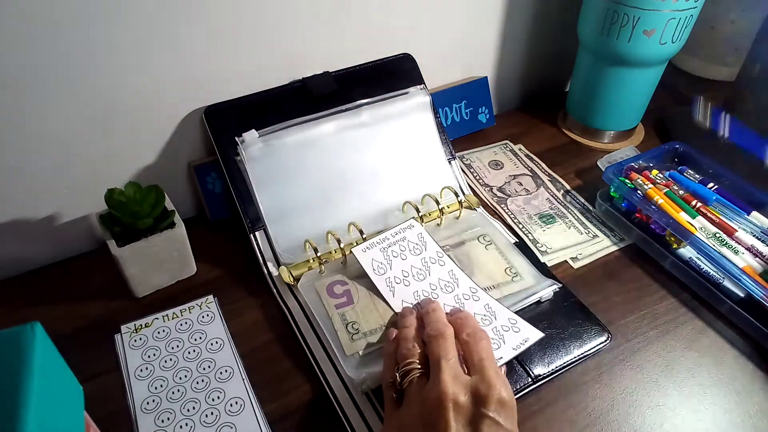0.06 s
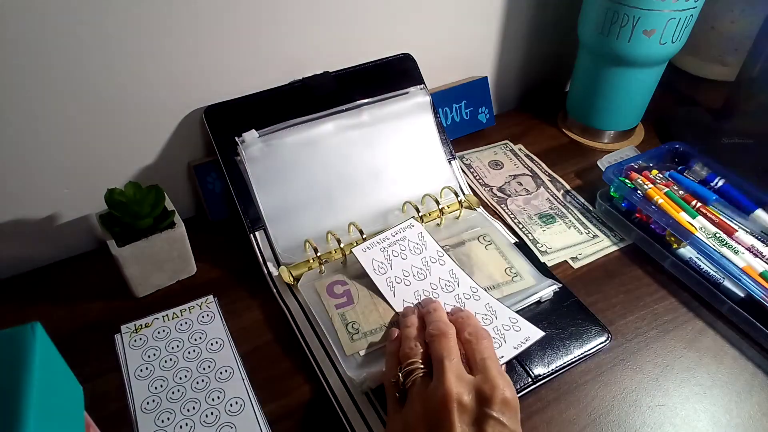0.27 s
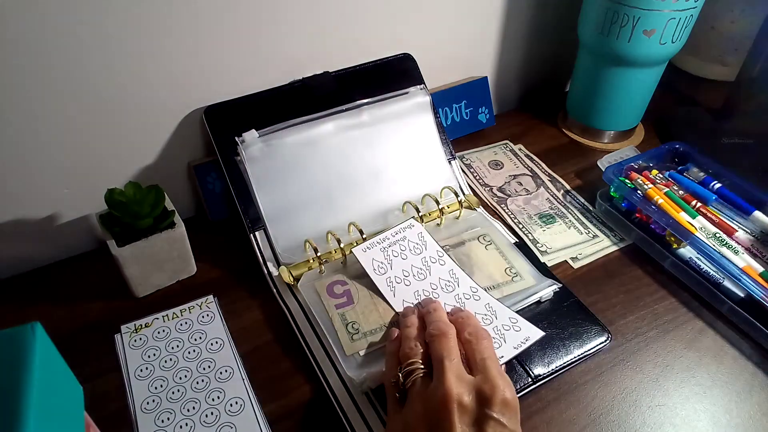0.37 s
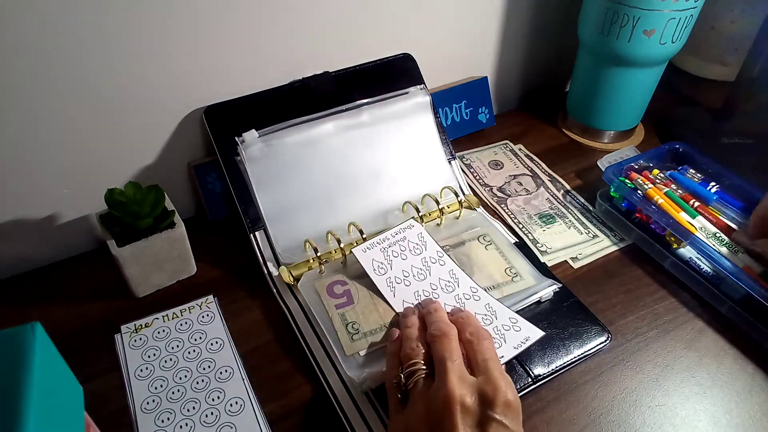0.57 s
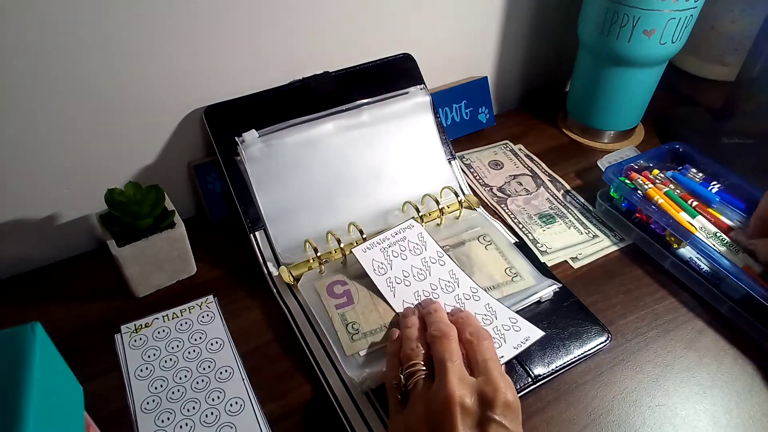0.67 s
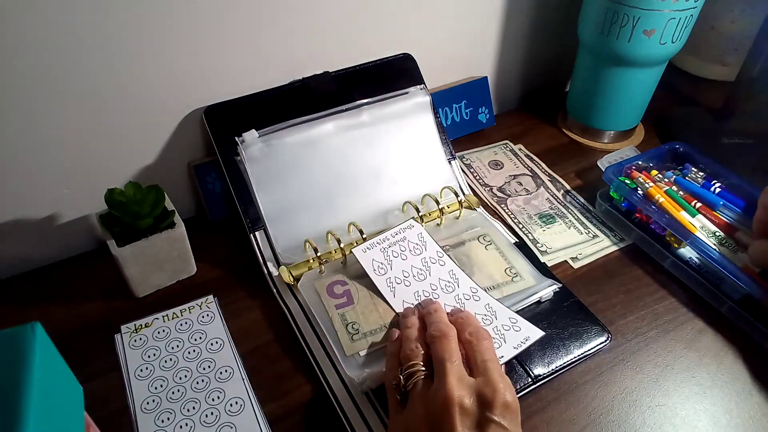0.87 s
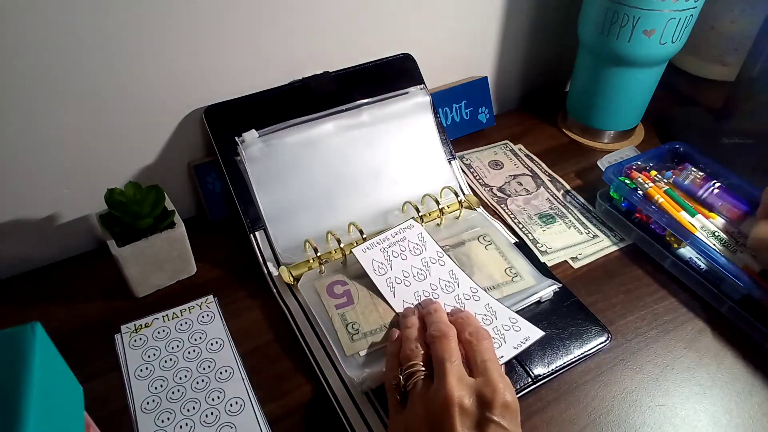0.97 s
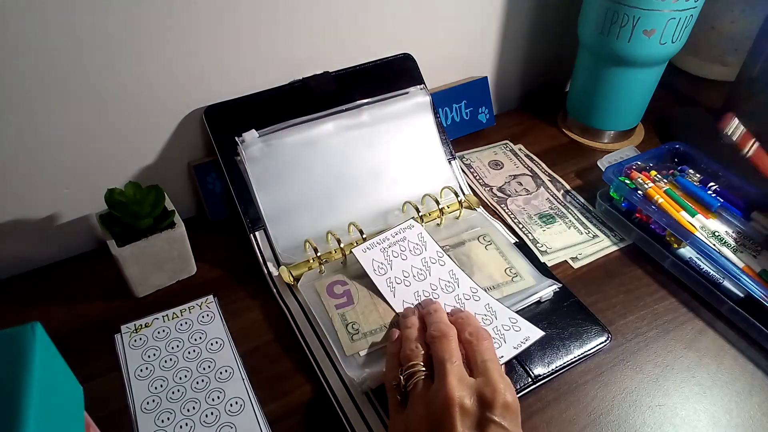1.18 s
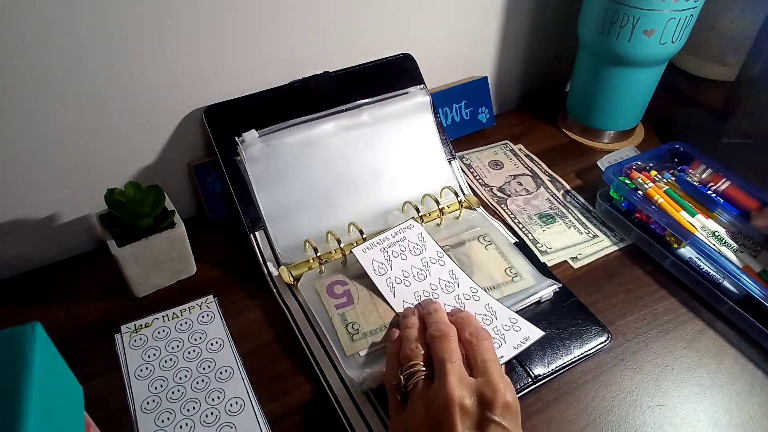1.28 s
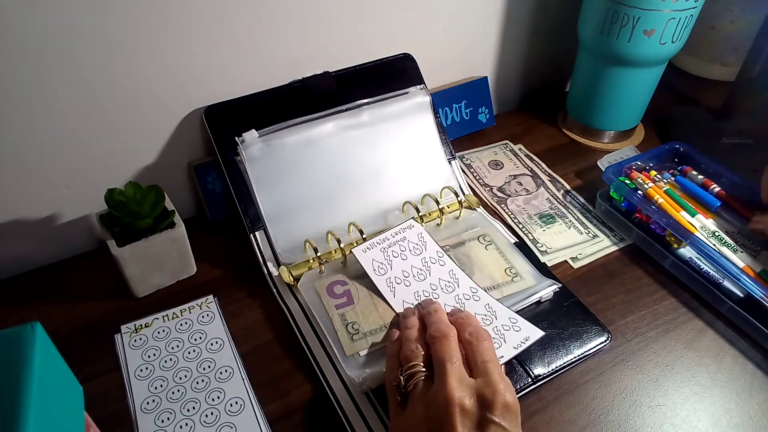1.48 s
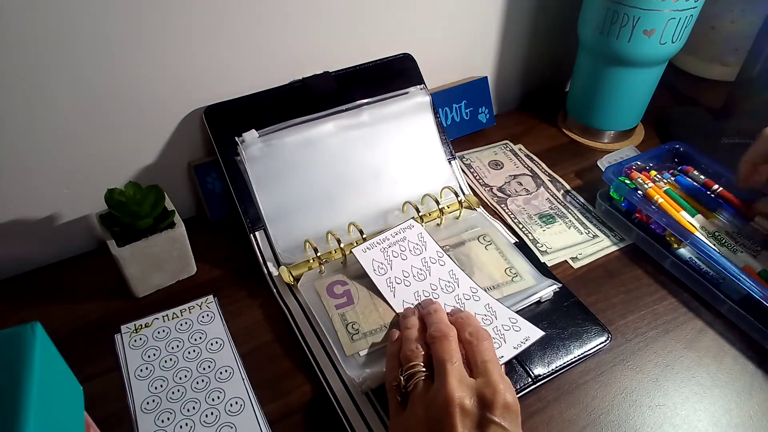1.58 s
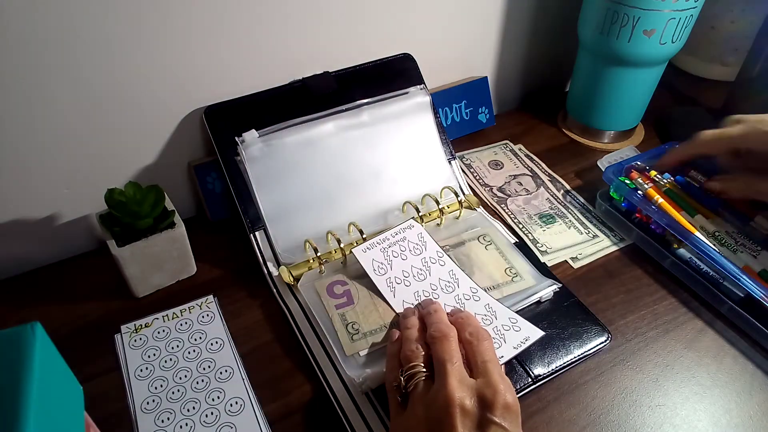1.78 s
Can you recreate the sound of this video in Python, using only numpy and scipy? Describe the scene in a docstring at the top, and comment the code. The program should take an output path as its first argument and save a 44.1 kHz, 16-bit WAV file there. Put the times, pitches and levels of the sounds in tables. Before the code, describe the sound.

Markers clack and rattle in a plastic box as a hand rummages through them indoors

```python
"""A hand rummages through markers in a plastic box on a desk, in a small quiet room.
Over a steady room tone, a faint touch and a hollow bump come first, then a stronger bump at 0.2 s.
Contacts crowd until 0.8 s, again from 0.9 to 1.2 s, and in a last short run from 1.4 to 1.6 s.
Each is a clack of ringing barrels with a thin tick; box walls knock, the bottom thumps, small jostles follow.
Clacks, knocks and thumps are shaped dense rings, box and desk are decaying sines; a noise tail is the room."""
import sys
import numpy as np
from scipy import signal
from scipy.fft import rfft, irfft
from scipy.io import wavfile
from scipy.ndimage import uniform_filter1d

SR = 44100
rng = np.random.default_rng(int(sys.argv[2]) if len(sys.argv) > 2 else 0)


def dump(signal):
    """Clip the signal to [-1, 1] and save it as 16-bit WAV at the path in sys.argv[1]."""
    limited = np.clip(np.atleast_2d(signal).T, -1, 1)
    pcm = np.round(limited * 32767).astype(np.int16)
    wavfile.write(sys.argv[1], SR, pcm)


N = 81585
STRIKE_RISE_S = 0.0009


def from_db(db):
    """Decibels to gain."""
    return 10 ** (np.asarray(db) / 20)


def at_hz(points, hz):
    """Read a table on a log-frequency axis."""
    p = np.array(points)
    return np.interp(np.log(np.maximum(hz, 1)), np.log(p[:, 0]), p[:, 1])


def unit(x):
    """Scale to energy one."""
    return x / np.sqrt(np.sum(x ** 2) + 1e-20)


def coloured(x, spectrum, size=8192):
    """Causal (minimum-phase) filter of unit energy with the given spectrum."""
    grid_hz = np.arange(size // 2 + 1) * SR / size
    cepstrum = irfft(np.log(from_db(at_hz(spectrum, grid_hz))))
    # fold onto positive time: minimum phase
    cepstrum[1:size // 2] *= 2
    cepstrum[size // 2 + 1:] = 0
    response = unit(irfft(np.exp(rfft(cepstrum))))
    return signal.fftconvolve(x, response)[:N]


def high_pass(x, hz):
    """Take away what lies below hz."""
    return signal.sosfilt(signal.butter(3, hz, "high", fs=SR, output="sos"), x)


def add(out, s, x):
    """Mix x into out at time s."""
    i = max(int(s * SR), 0)
    out[i:i + len(x)] += x[:len(out) - i]


def dense_ring(t60_s, size=4096, count=3):
    """Many close, equally strong modes dying together; energy one."""
    t = np.arange(size) / SR
    fade = (1 - np.exp(-t / STRIKE_RISE_S)) * from_db(-60 * t / t60_s)
    x = rng.standard_normal(size) * fade
    # alternately flatten the spectrum and restore the smooth fade
    for _ in range(count):
        spectrum = rfft(x)
        x = irfft(spectrum / (np.abs(spectrum) + 1e-12))
        x = x * fade / np.sqrt(np.abs(uniform_filter1d(x * x, size=96)) + 1e-14)
    return unit(x)


def struck(times_s, levels_db, t60_s, spectrum):
    """A dense plastic ring of one colour at each contact."""
    out = np.zeros(N)
    for s, db in zip(times_s, levels_db):
        add(out, s, from_db(db) * dense_ring(t60_s))
    return coloured(out, spectrum)


# room tone colour: (frequency [Hz], relative level [dB])
ROOM_TONE_COLOUR = [(30, -6), (65, 0), (130, -4), (300, -10), (700, -16), (2000, -21), (6000, -26),
                    (9000, -35), (14000, -34), (15500, -26)]
ROOM_TONE_DB = -76


def room_tone():
    """Steady noise, strongest in the bass."""
    return from_db(ROOM_TONE_DB) * coloured(rng.standard_normal(N), ROOM_TONE_COLOUR)


# room decay: (frequency [Hz], T60 [s])
ROOM_T60 = [(100, .45), (300, .3), (800, .22), (2000, .22), (5000, .2), (15000, .17)]
# room tail: (frequency [Hz], level re direct sound [dB])
ROOM_LEVEL = [(100, 7), (300, -2.5), (800, -1), (2000, -1), (5000, -11.5), (10000, -6.5), (15000, -6)]
ROOM_RISE_S = 0.0014


def room(x, count=12):
    """A diffuse tail of noise bands that dies faster in the treble."""
    t, tail = np.arange(SR // 2) / SR, 0
    edges_hz = np.geomspace(45, 18000, count + 1)
    for low, high in zip(edges_hz, edges_hz[1:]):
        hz = np.sqrt(low * high)
        band = signal.butter(2, [low, high], "band", fs=SR, output="sos")
        noise = signal.sosfilt(band, rng.standard_normal(len(t)))
        rise = 1 - np.exp(-(t / ROOM_RISE_S) ** 2)
        fade = from_db(-60 * t / at_hz(ROOM_T60, hz)) * rise
        bandwidth_gain = np.sqrt(2 * (high - low) / SR)
        tail = tail + unit(noise * fade) * bandwidth_gain * from_db(at_hz(ROOM_LEVEL, hz))
    return signal.fftconvolve(x, tail)[:N]


# heavier shoves, through the box into the desk: (time [s], level [dB])
SHOVES = [(0.221, -49), (0.299, -55), (0.388, -56.5), (0.496, -50.5), (0.557, -42.5), (0.59, -55),
          (0.728, -47.5), (0.935, -58), (1.058, -45.5), (1.134, -56.5), (1.21, -60), (1.445, -50),
          (1.513, -53.5), (1.57, -51.5)]
# desk top modes: (frequency [Hz], relative level [dB], T60 [s])
DESK_MODES = [(68.6, 2, 0.15), (90.5, -4, 0.24), (120, 4, 0.072), (181, -0.5, .14)]
DESK_RISE_S = 0.013


def desk():
    """The desk top swells and dies in a few low modes after each shove."""
    out, t = np.zeros(N), np.arange(SR // 2) / SR
    rise = 1 - np.exp(-t / DESK_RISE_S)
    for s, level_db in SHOVES:
        for hz, db, t60_s in DESK_MODES:
            swing = np.sin(2 * np.pi * (hz * t + rng.random()))
            add(out, s, from_db(level_db + db - 60 * t / t60_s) * rise * swing)
    return out


MODE_SPREAD_DB, LOAD_SHIFT = 2.5, 0.035   # scatter per hit: strength; detuning by the pile, share of pitch


def box(times_s, levels_db, modes):
    """Every contact drives each mode of the box with a strength and a slight detuning of its own."""
    out, t = np.zeros(N), np.arange(SR // 3) / SR
    for hz, db, t60_s in modes:
        fade = rng.choice([-1, 1]) * from_db(-60 * t / t60_s)
        scatter = rng.standard_normal((len(times_s), 2))
        for s, level_db, (strength, detune) in zip(times_s, levels_db, scatter):
            swing = np.sin(2 * np.pi * hz * (1 + LOAD_SHIFT * detune) * t)
            add(out, s, from_db(level_db + db + MODE_SPREAD_DB * strength) * fade * swing)
    return out


# nudges of the box: (time [s], level [dB])
BUMPS = [(0.0902, -74.5), (0.2019, -40)]
# box modes in a bump: (frequency [Hz], relative level [dB], T60 [s])
BUMP_MODES = [(198, -6, 0.098), (307, 0.5, 0.028), (400, -1, 0.12), (492.5, 1, 0.18), (1780, 3.5, 0.0255),
              (2025, 4.5, .03)]
BUMP_LOW_HZ = 170


def bumps():
    """The nudged box rings hollow in its modes, without deep bass."""
    times_s, levels_db = np.transpose(BUMPS)
    return high_pass(box(times_s, levels_db, BUMP_MODES), BUMP_LOW_HZ)


# box bottom on the desk: (frequency [Hz], relative level [dB], T60 [s])
BOTTOM_MODES = [(170.6, -1.5, 0.27), (351, 0.5, 0.42), (497.3, 3.5, 0.26)]
# box walls: (frequency [Hz], relative level [dB], T60 [s])
WALL_MODES = [(952, -5.5, .08), (1285, -10, .12), (1430, -12, .1), (1830, -2, .08), (1985, -3, .11),
              (2250, 1, .04), (3030, -5, .14), (3490, -9, .15), (4000, -9, .1)]
BOX_DB = -9


def box_ringing(times_s, knock_db, thump_db):
    """Knocks ring the wall modes, thumps the bottom modes."""
    walls = box(times_s, knock_db + BOX_DB, WALL_MODES)
    return walls + box(times_s, thump_db + BOX_DB, BOTTOM_MODES)


# thump colour: (frequency [Hz], relative level [dB])
THUMP_COLOUR = [(60, -44.5), (150, 1.5), (260, -5), (380, 3), (500, 4), (750, -13), (2000, -27)]
THUMP_DB, THUMP_T60_S, THUMP_SPREAD_OCTAVES = 21, 0.055, 0.22


def thumps(times_s, levels_db):
    """The bottom of the box thumps higher or lower with the spot that is hit."""
    out = np.zeros(N)
    shifts = THUMP_SPREAD_OCTAVES * rng.standard_normal(len(times_s))
    for s, db, octaves in zip(times_s, levels_db, shifts):
        colour = np.array(THUMP_COLOUR) * [2 ** octaves, 1]
        add(out, s, from_db(db + THUMP_DB) * coloured(dense_ring(THUMP_T60_S), colour))
    return out


# wall knock colour: (frequency [Hz], relative level [dB])
KNOCK_COLOUR = [(300, -33), (700, -9.5), (950, -2.5), (1150, -6), (1400, 0), (2200, -2), (3000, -2),
                (6000, -37.5)]
KNOCK_DB, KNOCK_T60_S = 22.5, 0.032


def knocks(times_s, levels_db):
    """The box walls knock along: a dense mid-range ring."""
    return struck(times_s, levels_db + KNOCK_DB, KNOCK_T60_S, KNOCK_COLOUR)


JOSTLE_SETTLE_S = 0.022
JOSTLE_DB, JOSTLE_SPREAD_DB = -11, 1   # re the contact; scatter
JOSTLE_CENTRE_HZ, JOSTLE_SPREAD_OCTAVES = 2640, 0.95


def jostles(times_s, levels_db, count=2):
    """After each contact neighbouring markers touch, weaker with delay, each with a pitch of its own."""
    steps = rng.uniform(0.12, 1, (len(times_s), count))
    wait_s = JOSTLE_SETTLE_S * np.cumsum(steps, axis=1)
    strength, octaves = rng.standard_normal((2, len(times_s), count))
    settling_db = 20 * np.log10(np.exp(-0.5 * wait_s / JOSTLE_SETTLE_S))
    db = levels_db[:, None] + JOSTLE_DB + JOSTLE_SPREAD_DB * strength + settling_db
    pitches_hz = JOSTLE_CENTRE_HZ * 2 ** (JOSTLE_SPREAD_OCTAVES * octaves)
    return clacks((times_s[:, None] + wait_s).ravel(), db.ravel(), pitches_hz.ravel())


# tick colour: (frequency [Hz], relative level [dB])
TICK_COLOUR = [(5000, -14.5), (7500, -5.5), (9500, -9.5), (12500, -10), (14200, -11), (15200, 7.5),
               (15700, -2), (16500, -20.5)]
TICK_DB, TICK_T60_S = 11.5, 0.015


def ticks(times_s, levels_db):
    """A thin, short treble ring on top of each contact."""
    return struck(times_s, levels_db + TICK_DB, TICK_T60_S, TICK_COLOUR)


BARREL_DB, BARREL_T60_S = 7.5, 0.012
BARREL_SPREAD = 0.07   # mode spacing, share of pitch


def barrels(times_s, levels_db, pitches_hz, size=2048, count=3):
    """Each struck barrel rings briefly in a few close modes around a pitch of its own."""
    out, t = np.zeros(N), np.arange(size) / SR
    fade = (1 - np.exp(-t / STRIKE_RISE_S)) * from_db(-60 * t / BARREL_T60_S)
    weights = np.hanning(count + 2)[1:-1]
    for s, db, hz in zip(times_s, levels_db, pitches_hz):
        offsets = np.linspace(-1, 1, count) + (rng.random(count) - 1 / 2)
        modes_hz = hz * (1 + BARREL_SPREAD * offsets)
        phases = rng.random((count, 1))
        swing = weights @ np.sin(2 * np.pi * (modes_hz[:, None] * t + phases))
        add(out, s, from_db(db + BARREL_DB) * unit(swing * fade))
    return out


# clack colour: (frequency [Hz], relative level [dB])
CLACK_COLOUR = [(1200, -39), (2300, -8), (3200, -2), (4400, 2.5), (5700, -1.5), (6600, 4), (7800, -19),
                (12000, -44)]
CLACK_DB, CLACK_T60_S = 8.5, 0.023
FOCUS_DB_PER_OCTAVE = 6   # fall on both sides of the barrel pitch
LIGHT_BELOW_DB, LIGHT_FOCUS = -31, 0.6   # lighter touches narrow: extra dB/octave per dB below, up to 10 dB


def clacks(times_s, levels_db, pitches_hz):
    """Barrels clack together; each clack favours its own pitch, light ones more so."""
    out, grid_hz = np.zeros(N), np.geomspace(300, 18000, 60)
    for s, db, hz in zip(times_s, levels_db, pitches_hz):
        focus = FOCUS_DB_PER_OCTAVE + LIGHT_FOCUS * np.clip(LIGHT_BELOW_DB - db, 0, 10)
        colour_db = at_hz(CLACK_COLOUR, grid_hz) - focus * np.abs(np.log2(grid_hz / hz))
        ring = dense_ring(CLACK_T60_S, size=2048)
        clack = coloured(ring, np.c_[grid_hz, colour_db], size=2048)
        add(out, s, from_db(db + CLACK_DB) * clack)
    return out


# contacts: (time [s], level [dB], barrel pitch [Hz], thump [dB], wall knock [dB], tick [dB])
# the last three are relative to the contact's level
CONTACTS = [(0.092, -62.5, 3600, -6.5, -28, -43), (0.2047, -27, 1865, -21, -9.5, -42),
            (0.2328, -25.5, 3450, -20.5, -12.5, -25), (0.2386, -25.5, 1810, -40, -18.5, -37),
            (0.2573, -59, 2310, -20, 15, -4), (0.2907, -17.5, 4920, -34, -18.5, -8.5),
            (0.293, -15.5, 2380, -31, -20, -10), (0.3722, -16.5, 4280, -30.5, -18, -16.5),
            (0.3852, -39.5, 3330, -30, -10, 0), (0.4398, -37, 2000, -18.5, -14, -45),
            (0.4854, -23.5, 2020, -39, -18.5, -14.5), (0.4919, -37.5, 2060, -9.5, -17, -32),
            (0.5169, -29.5, 3220, -36, -17.5, -18), (0.5287, -35, 4400, -27, -42, -13),
            (0.5389, -35, 3040, -51, -11, -7), (0.5516, -27.5, 2650, -31.5, -13, -15),
            (0.5611, -23.5, 3130, -22.5, -15.5, -30), (0.578, -22.5, 2150, -23.5, -22, -20.5),
            (0.5817, -38, 2120, -23, -1, -35), (0.592, -25, 2760, -33.5, -52, -48),
            (0.6435, -38.5, 2330, -39.5, -14, -45), (0.6752, -41, 1850, -31, -7.5, -4.5),
            (0.6878, -38.5, 1670, -28, -11.5, -10), (0.6967, -42, 1800, -18.5, -7, -8),
            (0.7217, -39.5, 1710, -17, -1.5, -3), (0.7255, -23, 3216, -23, -15.5, -16),
            (0.7298, -35, 3130, -28, -5, -2), (0.7482, -37, 3380, -20.5, -11.5, -30),
            (0.7687, -29.5, 3365, -38, -14, -27.5), (0.8993, -38, 2240, -45.5, -30.5, -40.5),
            (0.927, -29, 4590, -39.5, -24.5, -15.5), (0.9382, -30, 2530, -52, -25.5, -25.5),
            (0.9446, -33.5, 2180, -25.5, -14, -24.5), (0.9681, -44, 1900, -23.5, -9.5, -8),
            (1.0123, -40, 3130, -38.5, -22, -14), (1.052, -18.5, 4600, -35.5, -18, -19.5),
            (1.058, -15, 3533, -28.5, -17, -15.5), (1.0745, -38, 2930, -23, -19, -25),
            (1.091, -36, 3840, -22.5, -25.5, -20), (1.1095, -30.5, 2140, -42, -22.5, -28),
            (1.1187, -37, 4230, -43, -19, -36), (1.138, -21.5, 4660, -53, -25, -35),
            (1.1442, -25, 4380, -58, -12, -15), (1.153, -34.5, 1900, -20, -4, -4),
            (1.1617, -34, 2860, -19.5, -15, -16.5), (1.4304, -37.5, 2020, -29, -11, -10),
            (1.4347, -27.5, 1970, -28.5, -16, -28.5), (1.4443, -18, 2327, -30.5, -13.5, -13.5),
            (1.4883, -22.5, 5100, -29, -14.5, -13.5), (1.5048, -20, 4690, -38, -16.5, -5.5),
            (1.5301, -24.5, 1904, -28.5, -13, -29), (1.5696, -24, 3528, -30.5, -14.5, -12.5)]


def scene():
    """Markers, box, desk, room and room tone."""
    s, db, hz, thump, knock, tick = np.transpose(CONTACTS)
    thump_db, knock_db, tick_db = db + thump, db + knock, db + tick
    markers = clacks(s, db, hz) + barrels(s, db, hz) + ticks(s, tick_db)
    shell = knocks(s, knock_db) + thumps(s, thump_db)
    clatter = markers + shell + jostles(s, db)
    ringing = box_ringing(s, knock_db, thump_db)
    return (clatter + room(clatter) + ringing + bumps() + desk() + room_tone())[None]


MIC_LOW_HZ, CUTOFF_HZ = 55.6, 16100


def record(dry):
    """The microphone loses the deep bass; the top is cut steeply."""
    top = signal.ellip(10, 0.2, 70, CUTOFF_HZ, fs=SR, output="sos")
    return signal.sosfilt(top, high_pass(dry, MIC_LOW_HZ))


dry = scene()
out = record(dry)
dump(out)
```